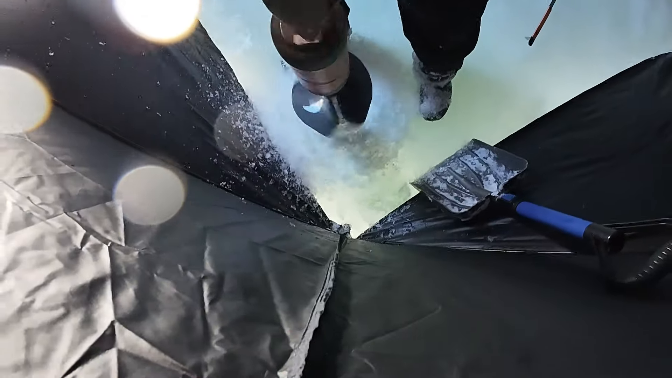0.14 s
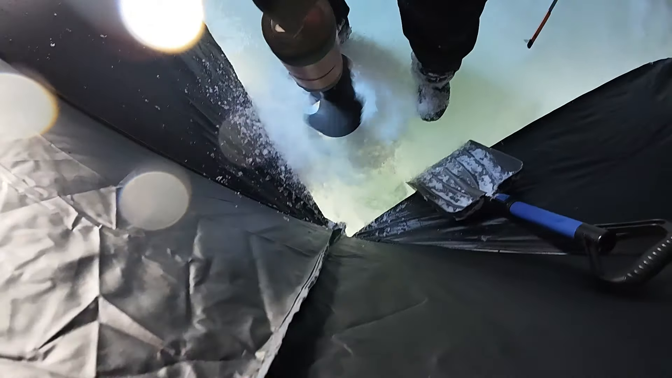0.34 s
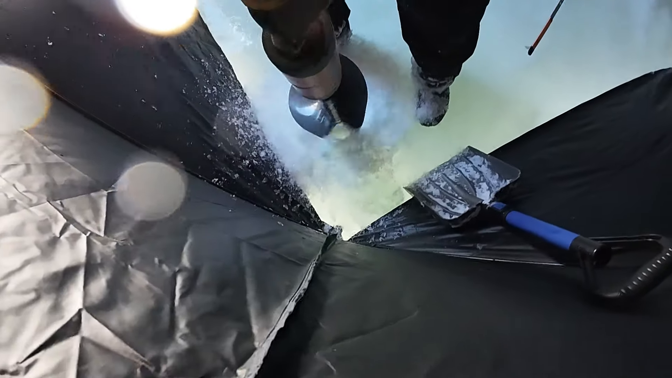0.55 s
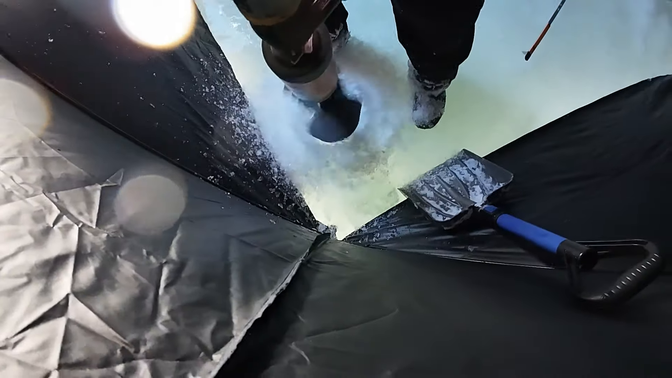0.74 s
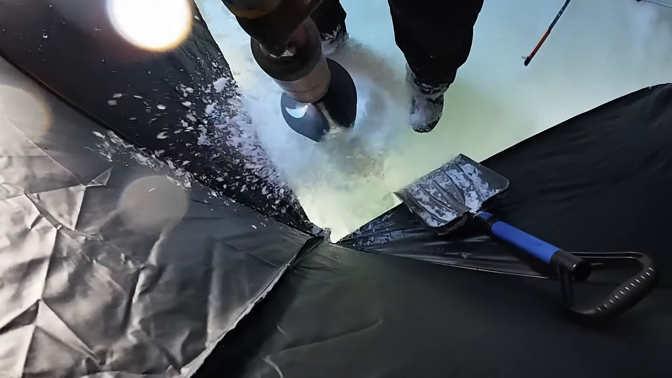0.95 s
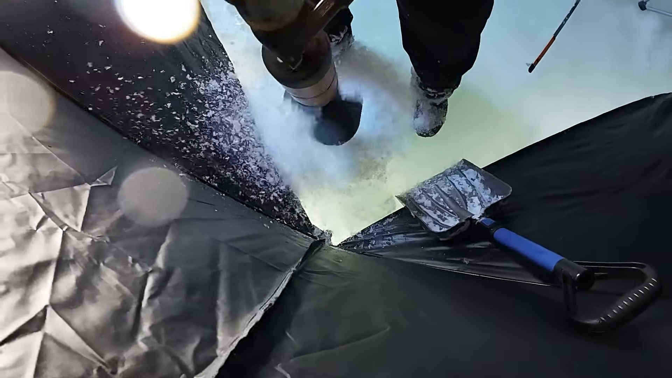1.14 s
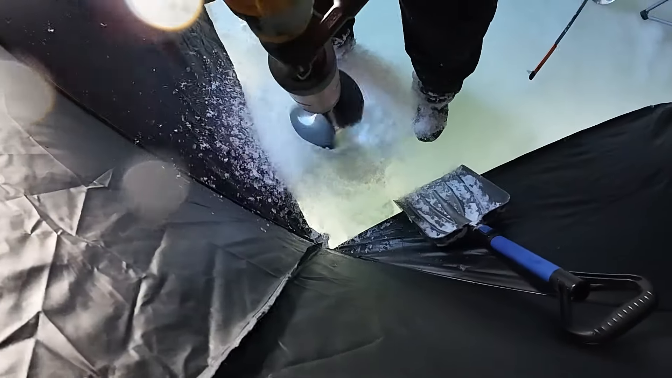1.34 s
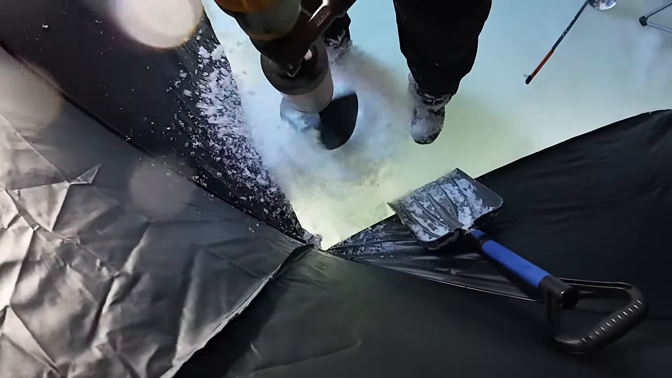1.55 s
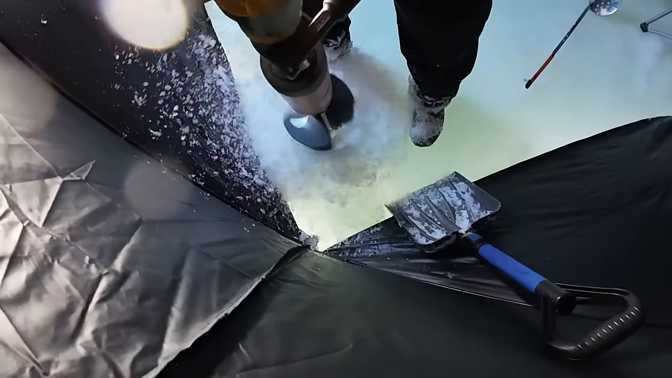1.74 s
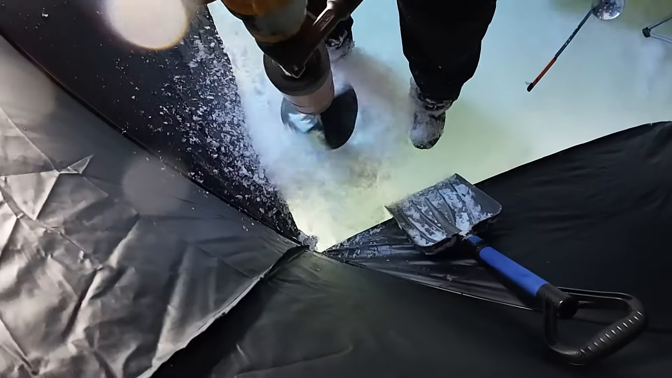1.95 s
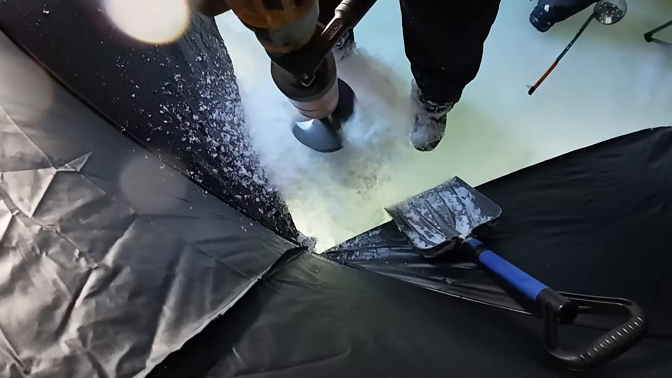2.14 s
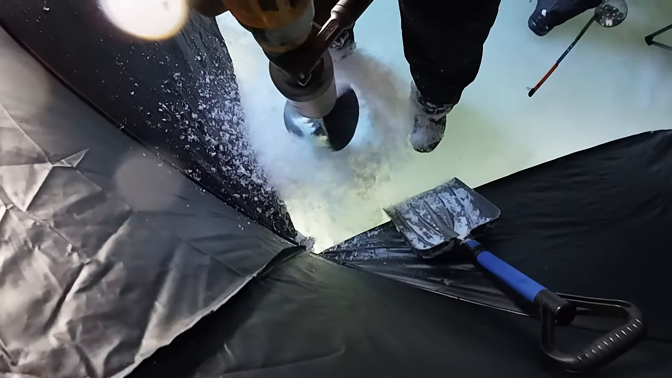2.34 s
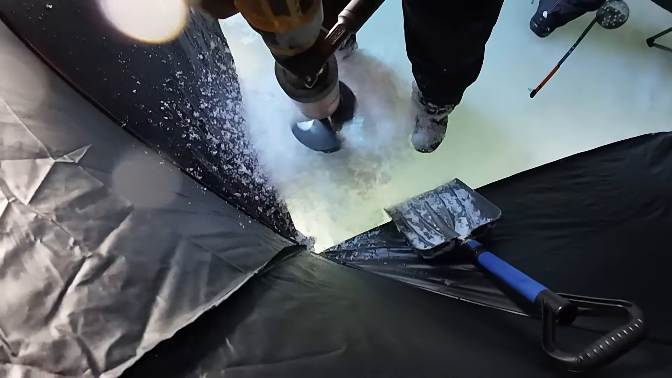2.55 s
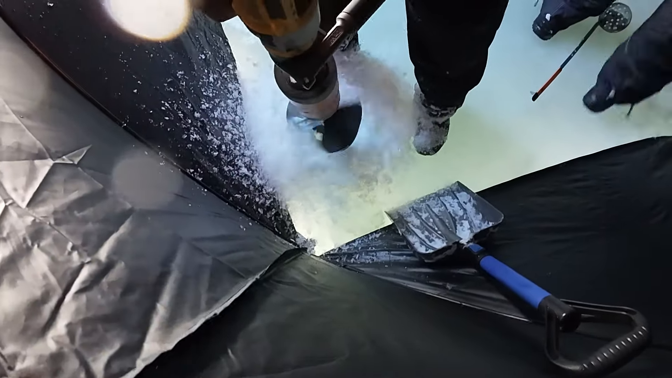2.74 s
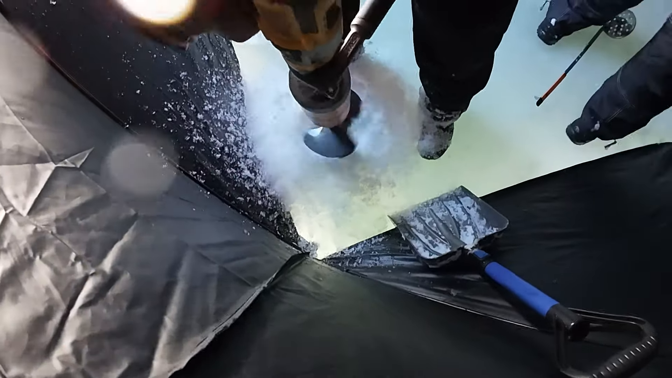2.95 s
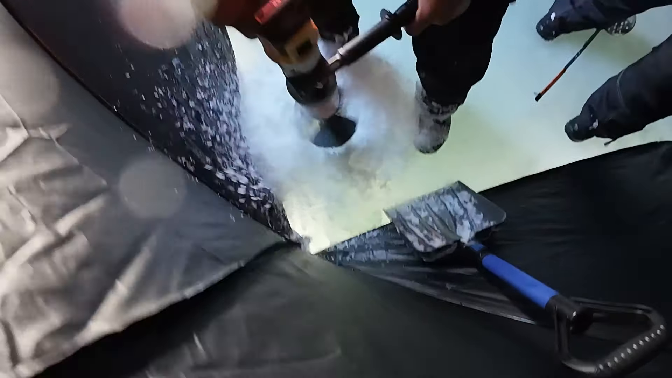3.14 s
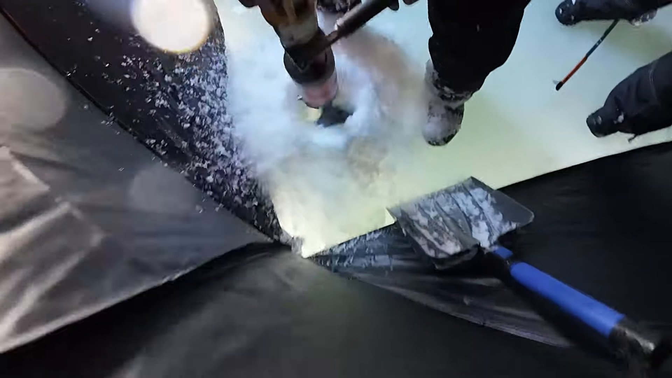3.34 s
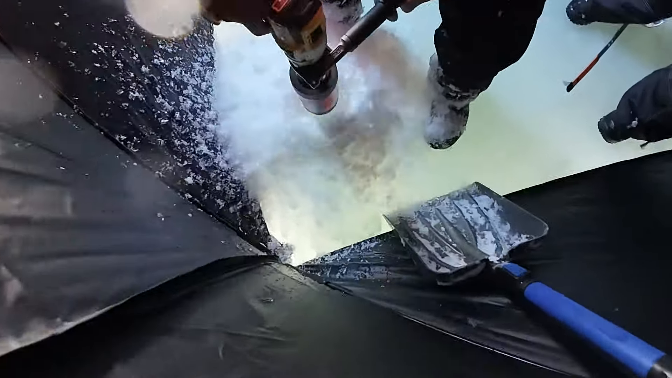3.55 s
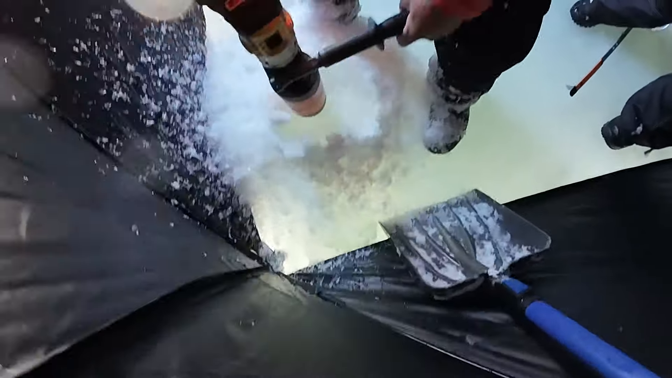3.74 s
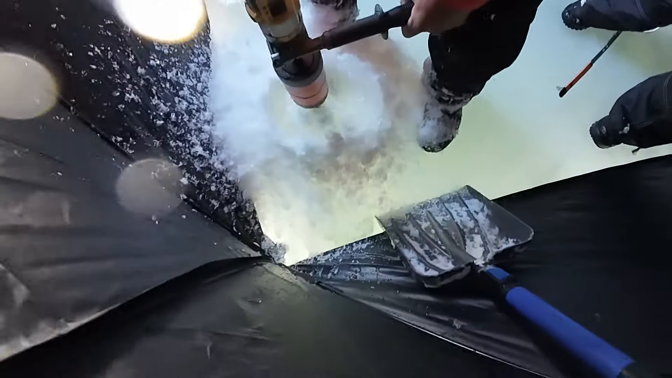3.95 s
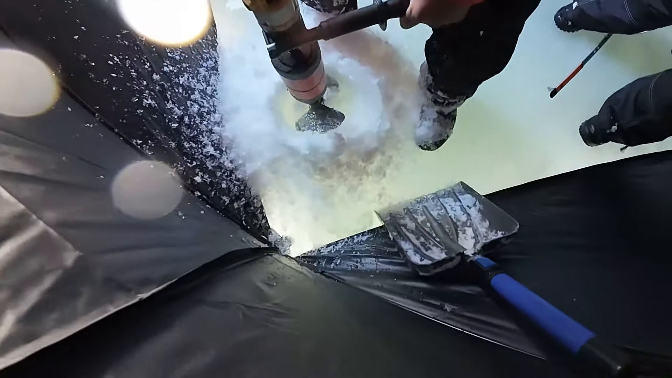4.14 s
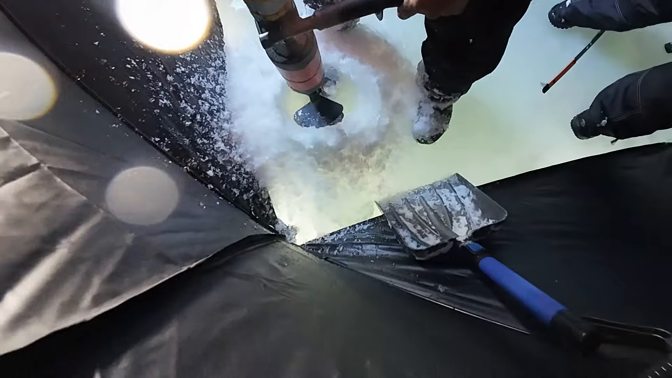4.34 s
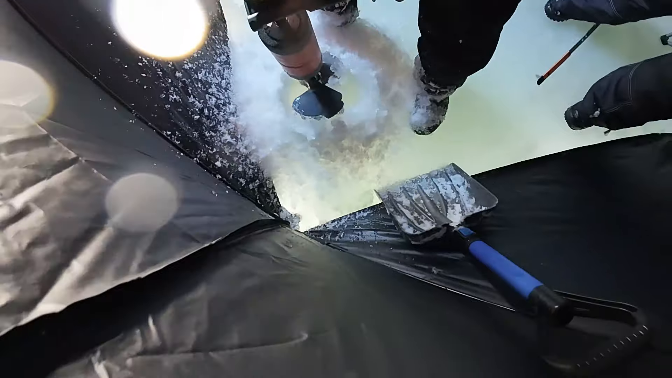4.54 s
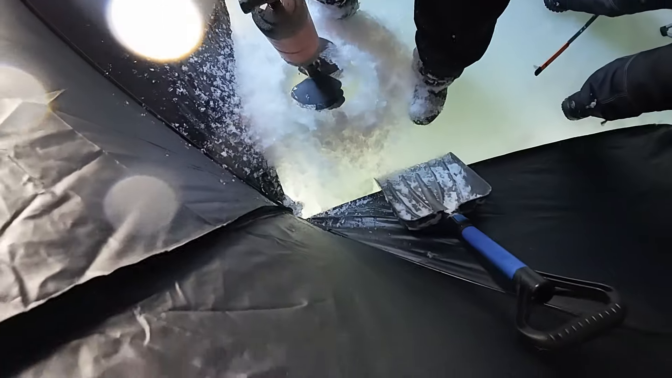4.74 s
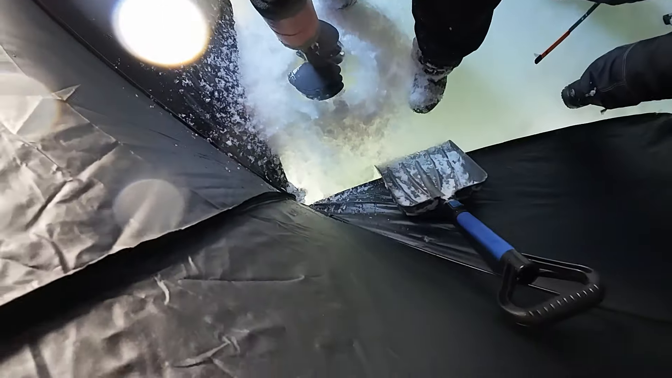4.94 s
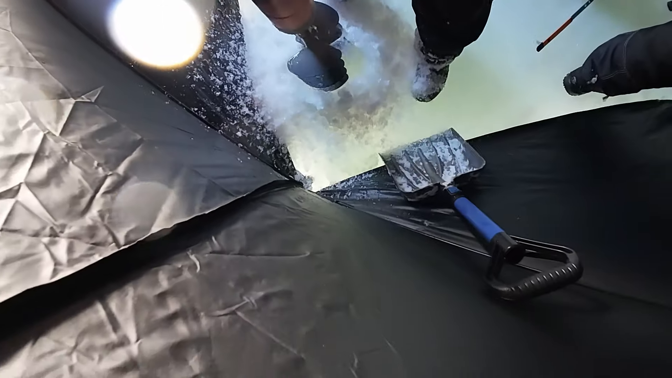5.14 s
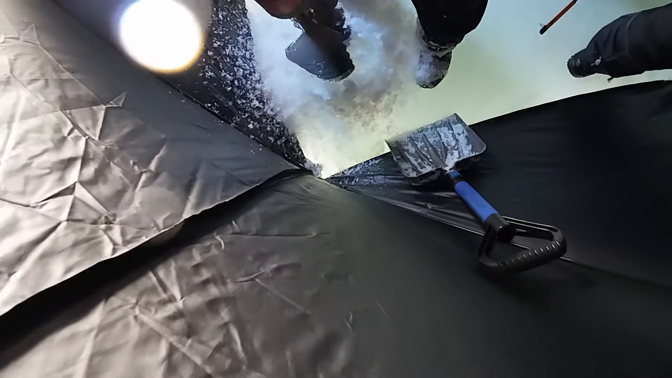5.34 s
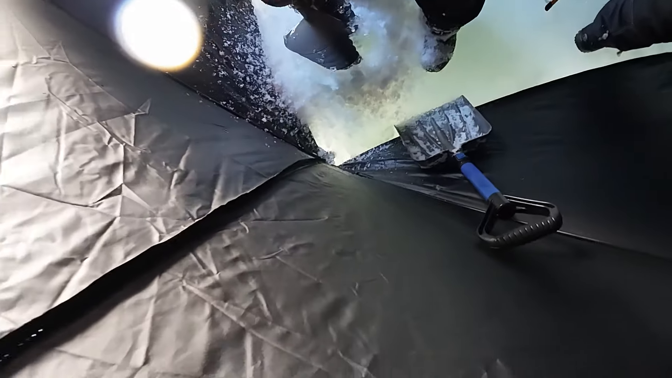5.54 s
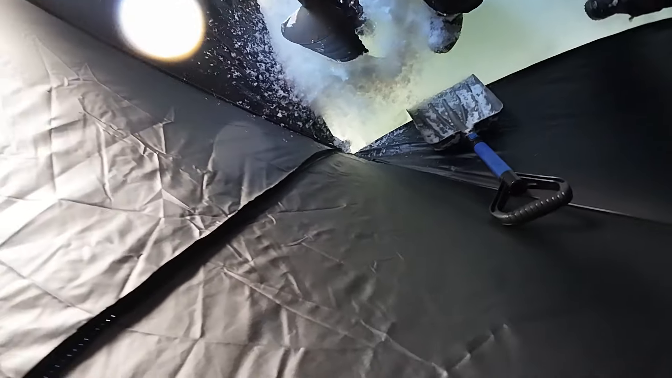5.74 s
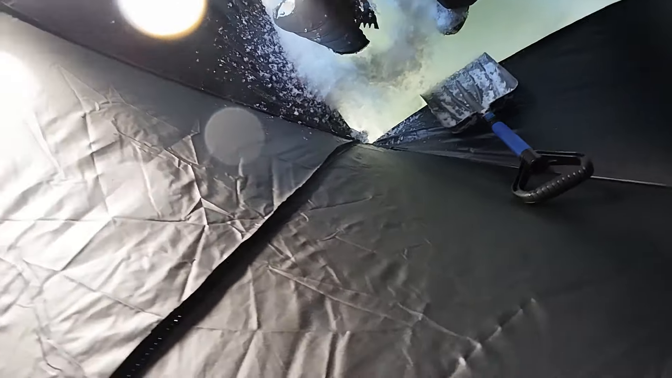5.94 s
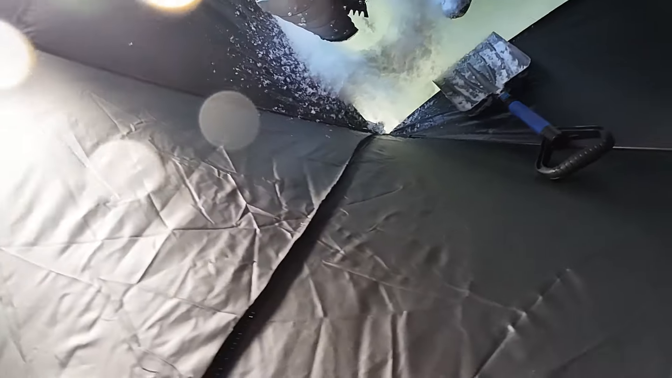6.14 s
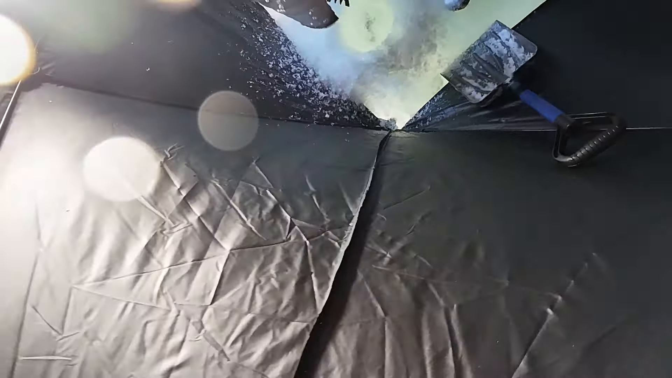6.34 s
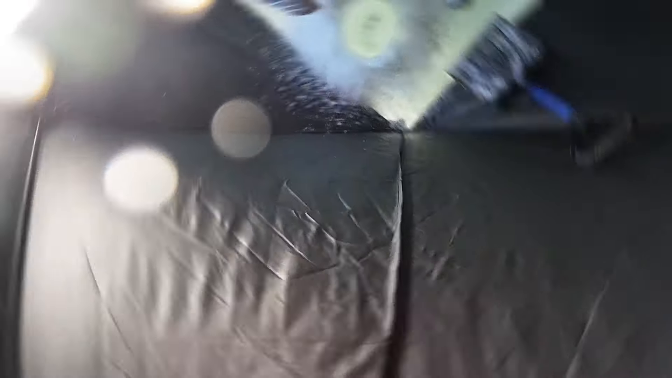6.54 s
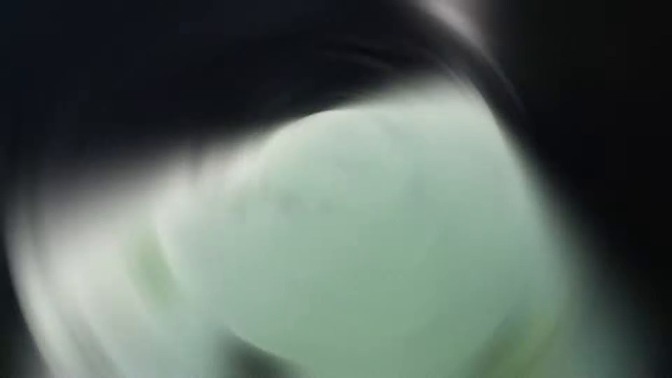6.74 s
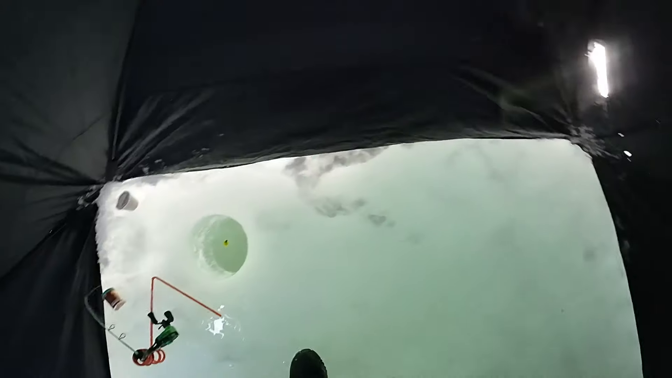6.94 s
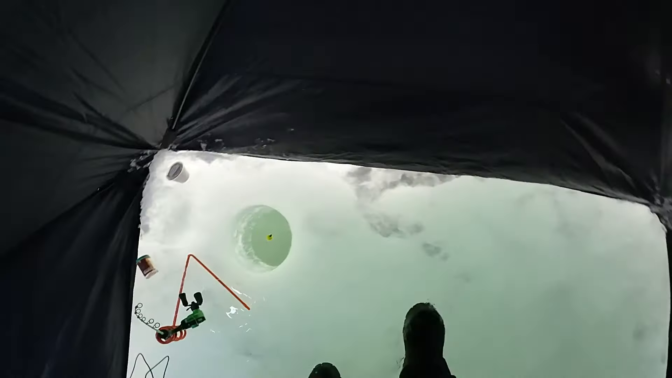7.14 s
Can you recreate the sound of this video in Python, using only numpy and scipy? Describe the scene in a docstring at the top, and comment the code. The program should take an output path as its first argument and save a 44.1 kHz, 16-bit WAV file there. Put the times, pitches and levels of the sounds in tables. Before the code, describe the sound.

Close in a shelter on the ice, a battery auger cuts with a loud gritty hiss, rough gear whine and pulsing scrape. At about three seconds it breaks through with knocks, the tone rises cleaner, then brakes abruptly with a snap. Quiet slush gulps, soft thuds, stiff cloth rustles and snowy ticks follow. Near the end come low buffets on the microphone and a faint sinking whine. Stereo, dry, the drill's treble slightly right.

```python
"""Battery auger in lake ice: ragged gear tones, fluttering motor whine, scraping blades, spraying chips.
Breakthrough unloads the gears to a cleaner tone; the brake pulls it down to a standstill.
Then slush gulps as swarms of ringing bubbles; knocks, clunks and thuds ring as decaying modes.
Cloth and snow crunch and snap as grains of noise; a faint whine of two harmonics sinks in pitch.
Low buffeting and still air, both shaped noise, lie beneath."""
import sys
import numpy as np
from scipy import signal
from scipy.fft import rfft, irfft, next_fast_len
from scipy.io import wavfile
from scipy.ndimage import uniform_filter1d, map_coordinates

SR = 44100
rng = np.random.default_rng(int(sys.argv[2]) if len(sys.argv) > 2 else 0)


def generate_wav(sig):
    """Save sig (samples, or channels by samples) to the path in sys.argv[1] as 16-bit PCM at SR."""
    pcm = np.round(np.clip(np.atleast_2d(sig).T, -1, 1) * 32767).astype(np.int16)
    wavfile.write(sys.argv[1], SR, pcm)


N = 321048

# Gear mesh while cutting: start_s, pitch_hz, overtone_db
MESH_CUTTING = [(0, 2640, -27), (.2, 2675, -25.5), (.3, 2555, -31), (.86, 2520, -33), (.94, 2764, -23),
                (1.0, 2505, -36), (1.1, 2690, -28), (1.2, 2500, -32), (1.38, 2540, -36), (1.44, 2660, -29),
                (1.475, 2400, -33), (1.52, 2467, -28), (1.65, 2475, -27), (1.78, 2670, -26),
                (1.82, 2427, -25), (1.94, 2640, -31), (2.0, 2475, -29), (2.15, 2507, -26),
                (2.4, 2570, -27.5), (2.52, 2507, -28), (2.64, 2693, -28), (2.7, 2550, -22),
                (2.755, 2820, -24), (2.84, 2460, -28), (2.96, 2475, -30), (3.04, 2570, -29),
                (3.07, 2493, -29)]
# Bit catching on rim or brake: centre_s, pitch_drop_hz, length_s, level_drop_db
CATCHES = [(2.996, 300, .015, 0), (3.138, 7.8, 0.0098, 8), (3.228, 110, 0.0073, -3),
           (3.296, 10, 0.017, 6.5), (3.322, 77, 0.0091, 2), (3.379, 117, 0.013, 2), (3.574, 124, .0084, 3),
           (3.599, 9.2, 0.011, 10), (3.635, 350, 0.011, 2), (3.653, 350, .007, 5), (3.675, 370, 0.0073, 0)]
# Cutting layers by name: start_db, deepening_db_per_s, burst_db, free_db, braking_db_per_s, dying_db_per_s
CUT_LAYERS = dict(shudder=(-31.5, 1.07, 5, -28, 47, 33.5), scrape=(-21.5, -1, 5.5, -25.5, 32, 134),
              chips=(-21, 0, 0.5, -24, 30, 118), hiss=(-19.5, 0.5, 0, -18.5, 102, 149))
# Operator's lean on the auger, scaled per layer: start_s, push_db
PUSH = [(0, -1), (.5, -0.5), (1.0, 1.5), (1.3, 0.5), (2.0, -1), (2.45, 0), (2.7, -1), (2.9, -2.5)]
# Spectra of the cutting noises: freq_hz, density_db
SHUDDER_SPECTRUM = [(15, -40), (25, -9), (54, -10), (86, -6.5), (120, -2.5), (216, -2.5), (362, -2.5),
                    (600, -7), (780, -9), (1320, -120)]
SCRAPE_SPECTRUM = [(300, -33), (550, -6), (900, -7.5), (2000, -7), (2600, -6.5), (4000, -83)]
CHATTER_SPECTRUM = [(350, -40), (700, -0.5), (1300, -0.5), (2500, -5), (4000, -42)]
CHIP_SPECTRUM = [(1200, -11), (2400, -1), (4000, 0), (5600, -2), (6600, -4.5), (7200, -19), (9000, -44)]
HISS_SPECTRUM = [(3000, -36), (6000, -3), (7100, -5.5), (8700, -1.5), (11500, -1.5), (14000, -6.5),
                 (16500, -15)]
# Resonances of shaft with blades, and of housing: mode_hz, width_hz, gain_db
SHAFT_MODES = [(224, 100, -3), (438, 30, -5), (883, 190, -2), (1162, 150, 3.5), (1523, 115, -3.5),
               (1860, 95, -1.5)]
HOUSING_MODES = [(7890, 220, 3.5), (12700, 260, -5), (13170, 380, 5), (15300, 210, -20.5)]
# Rough hum of the unloaded auger: start_s, level_db
HUM_LEVELS = [(3.1, -33), (3.19, -25), (3.27, -31), (3.31, -25.5), (3.38, -33.5), (3.55, -31.5),
              (3.65, -40)]
# Dull knocks: auger on rim, brake clunks, low thuds and hollow plops at the hole: start_s, level_db, pitch_hz
KNOCKS = [(3.06, -10.5, 449.6), (3.186, -13, 885), (3.21, -10.5, 1140), (3.343, -11.5, 1080),
          (3.468, -13.5, 1247), (3.655, -17.5, 1054), (3.677, -16.5, 820), (3.94, -13, 926),
          (4.25, -21.5, 270), (4.265, -24, 125), (4.277, -22.5, 1190), (4.285, -21, 305), (4.567, -17, 254),
          (4.45, -27, 95), (4.696, -27, 120), (4.863, -21.5, 442), (4.895, -20.5, 282), (4.905, -20.5, 121),
          (4.13, -27, 755), (4.715, -24, 266), (4.97, -21, 1243), (5.085, -25.5, 297), (5.151, -22.5, 353),
          (5.246, -22.5, 740), (5.275, -25, 617), (5.335, -27, 610), (5.433, -20, 860), (5.501, -22, 650),
          (5.56, -25, 625), (5.59, -28, 623), (5.619, -23, 1025), (5.632, -22, 643), (5.779, -22, 467),
          (5.819, -21.5, 429), (5.825, -27, 653), (5.849, -26, 660), (6.04, -23.5, 1456),
          (6.07, -27.5, 1340), (6.2, -29.5, 1007), (6.252, -30, 434), (6.879, -27, 1470), (7.16, -31, 344)]
# Surges of slush: full_s, hold_s, gulp_db, splash_db
SURGES = [(3.94, 0.041, -33.5, -29.5), (4.12, 0.12, -66, -37.5), (4.25, 0.044, -33, -38.5),
          (4.45, .03, -40, -43), (4.57, 0.014, -39, -42), (4.7, 0.038, -33.5, -40),
          (4.87, 0.049, -33.5, -33.5), (5.01, 0.079, -41.5, -42), (5.15, 0.03, -44, -49),
          (5.25, 0.15, -41.5, -44), (5.44, 0.12, -48, -40), (5.6, 0.11, -59, -38.5),
          (5.79, 0.078, -41.5, -39.5), (6.04, 0.11, -62, -41), (6.58, 0.023, -48, -47),
          (6.87, 0.046, -67, -41.5), (7.25, .03, -38, -33)]
# Trickle between surges: start_s, gulp_db, splash_db
TRICKLE = [(3.8, -59, -36.5), (4.2, -44.5, -38), (5.7, -59, -38.5), (6.0, -61, -48), (7.28, -50, -44.5)]
# Centre pitches of the hole's bubbles: start_s, gulp_hz, splash_hz
HOLE_PITCHES = [(4.9, 253, 1000), (5.2, 340, 821), (5.6, 330, 770), (5.8, 444, 734), (6.05, 380, 1230)]
# Spectrum of the wet splash: freq_hz, density_db
SPLASH_SPECTRUM = [(60, -60), (130, -17), (300, -9.5), (520, -6.5), (1150, -5), (1700, -7.5), (2500, -15),
                   (4000, -20), (6000, -56)]
# Rustles of cloth and snow: full_s, hold_s, crunch_db, fizz_db
RUSTLES = [(3.74, 0.013, -24, -35), (3.95, 0.19, -39, -45.5), (4.3, 0.48, -53, -47),
           (4.85, 0.05, -43, -40.5), (4.955, 0.077, -48, -40.5), (5.27, 0.047, -40.5, -51),
           (5.37, 0.013, -40, -39), (5.44, 0.017, -36.5, -34.5), (5.56, 0.15, -48, -47.5),
           (5.72, 0.24, -38, -41), (6.0, 0.28, -42.5, -42), (6.3, 0.11, -42, -39.5),
           (6.45, 0.031, -37, -34.5), (6.51, 0.056, -44, -42), (6.575, 0.032, -35.5, -38),
           (6.87, 0.028, -45, -64), (7.085, 0.017, -29.5, -37.5), (7.15, .08, -43, -49),
           (7.25, .03, -36, -43)]
# Spectra of crunch and fizz: freq_hz, density_db
CRUNCH_SPECTRUM = [(300, -90), (900, -19), (1500, -7), (2500, -2), (4000, -4), (6000, -11.5), (9000, -17.5)]
FIZZ_SPECTRUM = [(2650, -10.5), (4500, -2.5), (6220, -1), (6980, -6.5), (8690, -1.5), (12100, -2.5),
                 (13200, 2.5), (15700, -21)]
# Snaps and ticks: start_s, level_db, pitch_hz, treble_db
SNAPS = [(3.712, -6, 2005, 5), (3.717, -7.5, 4020, 6), (3.724, -16, 2320, -9), (3.917, -26, 890, -20),
         (3.9478, -16, 2070, -22), (3.952, -28, 4470, -10), (4.046, -26, 3500, -10),
         (3.9789, -30, 1810, -21), (4.522, -22.5, 1110, -9), (4.565, -23, 1300, -15),
         (4.608, -22, 1100, -7), (4.6307, -23, 1090, -3), (4.757, -24, 1190, -13), (4.787, -28, 1900, -15),
         (4.8437, -32, 9060, 4), (4.857, -26.5, 10400, 8), (4.8831, -32, 9400, 6), (4.9156, -35, 9000, 8),
         (4.9515, -35, 4900, 10), (4.997, -33, 4020, 2), (5.2466, -39, 2030, -11), (5.271, -30, 2130, -24),
         (5.439, -27, 1780, -15), (5.609, -29.5, 4600, -10), (5.7056, -22.5, 6100, -6),
         (5.7816, -31, 3550, 5), (5.8565, -27, 5100, 0), (5.852, -26, 2170, -19), (6.109, -24, 6100, -16),
         (6.16, -28, 3170, -13), (6.1867, -32, 2910, 3), (6.265, -30, 3120, 3), (6.2978, -21.5, 5500, -15),
         (6.3272, -20, 2850, -18), (6.3685, -17, 2850, -1), (6.3885, -27, 2200, 5), (6.4543, -37, 2190, -5),
         (6.4606, -26, 4450, 9), (6.5709, -30, 4250, -5), (7.0868, -37, 2210, -13),
         (7.2499, -20, 2390, -22)]
# Distant whine: start_s, second_harmonic_db, third_harmonic_db
FAR_LEVELS = [(6.5, -53, -46), (6.6, -40, -39), (6.66, -50, -39), (6.73, -54, -50), (6.8, -45, -43),
              (6.9, -43, -41), (7.0, -45, -47), (7.26, -48, -48)]
# Low rumble, first shaken by the drill, then blown on the ports: start_s, level_db
BUFFET_LEVELS = [(0, -55), (3.7, -42), (3.85, -54), (5.0, -63), (6.45, -74), (6.58, -38), (6.63, -48),
                 (6.75, -46), (6.79, -36), (6.82, -41), (6.855, -33), (6.9, -50), (6.96, -59), (7.28, -50)]
# Part of the rumble opposed between ports: start_s, opposed_gain
BUFFET_OPPOSED = [(5.0, .1), (5.4, .8)]
# Spectrum of still air in the shelter: freq_hz, density_db
AIR_SPECTRUM = [(20, 7), (60, 3), (200, 6), (500, -26), (1500, -30), (4000, -70)]
# Left-right likeness of auger and surroundings: freq_hz, correlation
AUGER_LIKENESS = [(60, .99), (130, .996), (400, .995), (700, .99), (1400, .994), (3100, .93), (6800, .7),
                  (15000, .7)]
AROUND_LIKENESS = [(60, .95), (200, .99), (400, .993), (1400, .985), (2400, .94), (4400, .75), (8000, .45),
                   (15000, .35)]
# Left over right, auger and surroundings: freq_hz, balance_db
AUGER_BALANCE = [(60, 0), (1400, 0), (3000, .6), (6000, .2), (9000, -2.6), (13000, -4), (16000, -4)]
AROUND_BALANCE = [(60, 0), (2400, 0), (4400, .5), (8000, -1), (15000, -1.5)]
# Phase by which left leads, auger: freq_hz, lead_rad
AUGER_LEAD = [(0, 0), (3450, 0), (9300, 1), (11600, 0.42), (12000, 0.4), (13600, 0.71), (14200, 0.83),
              (15400, 0.3)]

THROUGH_S, SPIN_UP_S, BRAKE_S, STOP_S = 3.07, 0.082, 3.614, 3.71
BURST_S, BURST_LENGTH_S = 3.036, 0.15  # breakthrough burst
MESH_FREE_HZ, MESH_CUTTING_FREE_DB, OVERTONE_FREE_DB = 3078, (-31, -15.5), -30
MESH_SING_UP_S = 0.18
BRAKE_HZ_PER_S, BRAKE_DB_PER_S = 670, 113
CASE_HZ, CASE_WIDTH_HZ, CASE_DB = 2440, 75, 2.5  # gear case sings along near its own tone
STAGE_RATIO = .617  # slower gear stage, pitch over mesh
STAGE_DB, STAGE_DB_PER_S, STAGE_FREE_DB = -37.5, 2.4, -35.5
WHINE_CUTTING_FREE_HZ, WHINE_CUTTING_FREE_DB = (10070, 12130), (-23, -25.5)
WHINE_HZ_PER_MESH_HZ = 3  # while cutting
BITE_HZ, FIRST_BITE_S, BITE_DECAY = 6.28, .015, 2.5  # two bites a turn; decay per bite period
SCRAPE_BITE_DB, SCRAPE_BITE_LOSS_DB_PER_S = 0.92, 0.3
CHATTER_DB, CHATTER_LOSS_DB_PER_S, CHATTERS_PER_S, CHATTER_BURST_DB = -24, 1.6, 450, 6
KNOCK_T60_S, SNAP_T60_S = 0.069, 0.027
SURGE_RISE_S, SURGE_FALL_S = 0.02, 0.061
RUSTLE_RISE_S, RUSTLE_FALL_S, IDLE_CRUNCH_DB, IDLE_FIZZ_DB = 0.0072, 0.033, -46.5, -49.5
TICKS_PER_S, TICK_DB = 70, -7  # level against the rustle
FAR_START_S, FAR_END_S, FAR_HZ, FAR_SAG_HZ_PER_S = 6.5, 7.26, 734, 77
TOP_HZ = 15780


def gears():
    """Mesh tones, ragged under load, cleaner when free; catches drop the pitch."""
    free = running_free()
    cutting_hz, overtone_db = curves(MESH_CUTTING)
    brake_chatter = window(3.635, 4, .01)
    load = np.maximum(between((.85, .12), free ** 2), .9 * brake_chatter)

    hz = between((cutting_hz, MESH_FREE_HZ), free) - BRAKE_HZ_PER_S * since(BRAKE_S)
    jitter = (.004 + .014 * load) * wobble(35)
    jitter += .07 * window(3.632, 4, .008) * wobble(500)
    drag_hz = sum(drop_hz * bump(s, length) for s, drop_hz, length, _ in CATCHES)
    hz = hz * (1 + jitter) - drag_hz

    dip_db = sum(db * bump(s, length) for s, _, length, db in CATCHES)
    dip_db += BRAKE_DB_PER_S * since(BRAKE_S + 0.016)
    first_db = between(MESH_CUTTING_FREE_DB, window(THROUGH_S, 9, MESH_SING_UP_S)) - dip_db
    first_db -= 5 * window(3.645, 4, .01)  # chatter smothers the tone
    first_db += CASE_DB * np.exp(-((hz - CASE_HZ) / CASE_WIDTH_HZ) ** 2)
    first_db += 4.4 * load * wobble(29.83)
    second_db = between((overtone_db, OVERTONE_FREE_DB), free) - dip_db + 2.5 * wobble(35)
    stage_db = between((STAGE_DB + STAGE_DB_PER_S * since(0), STAGE_FREE_DB), free)
    stage_db += 4.5 * wobble(35)

    tones = amp(first_db) * fuzzy_tone(hz, load, blur_hz=95.3)
    tones += amp(second_db) * fuzzy_tone(2 * hz, between((.9, .6), free), blur_hz=340)
    stage = fuzzy_tone(STAGE_RATIO * hz, .97, blur_hz=150)
    tones += amp(stage_db) * window(-1, 3.63, .02) * stage
    return tones * window(-1, STOP_S, 0.018)


def motor():
    """Broad whine strands that flutter in pitch and level once a rotor turn."""
    free = running_free()
    hz = between(WHINE_CUTTING_FREE_HZ, free)
    level_db = between(WHINE_CUTTING_FREE_DB, free) - 50 * since(BRAKE_S)
    mesh_hz = curves(MESH_CUTTING)[0]
    hz = hz + WHINE_HZ_PER_MESH_HZ * (mesh_hz - np.median(mesh_hz)) * (1 - free)
    turn_rad = 2 * np.pi * np.cumsum(hz / 164) / SR
    jitter = between((.014, .005), free) * wobble(70)  # steadier when unloaded
    flutter_hz = hz * (1 + 0.011 * np.sin(turn_rad) + jitter)
    strands = fuzzy_tone(flutter_hz, 1, blur_hz=950)
    strands += amp(-10.5) * fuzzy_tone(flutter_hz * 5 / 4, 0.88, blur_hz=814)
    strands += amp(-10.0) * fuzzy_tone(flutter_hz * 3 / 2, .98, blur_hz=800)
    level_db = level_db + 2.6 * np.sin(turn_rad) + 3.04 * wobble(24.73)
    return amp(level_db) * strands * window(-1, STOP_S, 0.015)


def blades():
    """Ice shudders, blades scrape and ring the shaft, hard grains break, chips spray, housing hisses."""
    shudder_db, scrape_db, chip_db, hiss_db = [cut_level(*row) for row in CUT_LAYERS.values()]
    push_db, = curves(PUSH)
    phase = (BITE_HZ * (np.arange(N) / SR - FIRST_BITE_S)) % 1
    attack = uniform_filter1d(np.exp(-BITE_DECAY * phase), size=900)  # sets in fast, then eases
    bite = unit(attack - attack.mean()) + 0.35 * wobble(25)

    shudder = grit(SHUDDER_SPECTRUM, spike_db=3, lump_db=2.5, lumps=32)
    shudder = unit(filtered(shudder, ringing(SHAFT_MODES, direct=0.68)))
    scrape = knotted(grit(SCRAPE_SPECTRUM, spike_db=1.5, lump_db=1.0, lumps=90), depth_db=2.5)
    scrape = unit(filtered(scrape, ringing(SHAFT_MODES, direct=1.0)))
    chatter = knotted(sparks(CHATTERS_PER_S, spread_db=3, spectrum=CHATTER_SPECTRUM), depth_db=2.5)
    chatter = unit(filtered(chatter, ringing(SHAFT_MODES, direct=0.37)))
    chips = grit(CHIP_SPECTRUM, spike_db=1, lump_db=1.16, lumps=60)
    hiss = grit(HISS_SPECTRUM, spike_db=1.0, lump_db=1.1, lumps=45)
    hiss = unit(filtered(hiss, ringing(HOUSING_MODES, direct=0.89)))

    scrape_bite_db = (SCRAPE_BITE_DB - SCRAPE_BITE_LOSS_DB_PER_S * since(0)) * bite
    chatter_db = CHATTER_DB - CHATTER_LOSS_DB_PER_S * since(0) + 2.16 * bite + push_db
    chatter_db += CHATTER_BURST_DB * bump(BURST_S, BURST_LENGTH_S)
    sound = amp(shudder_db + 1.9 * push_db + 1.0 * bite) * shudder
    sound += amp(scrape_db + 0.38 * push_db + scrape_bite_db) * scrape
    sound += amp(chatter_db) * (1 - running_free()) * chatter
    sound += amp(chip_db + 0.46 * bite) * chips
    return sound + amp(hiss_db) * hiss


def free_hum():
    """Unloaded auger rumbles in the hole: two blurred tones."""
    hum = fuzzy_tone(250 * (1 + 0.0786 * wobble(19)), 0.99, blur_hz=149.8)
    hum += amp(-2.5) * fuzzy_tone(385 * np.ones(N), 1.0, blur_hz=120.3)
    return amp(curves(HUM_LEVELS)[0]) * hum * window(3.1, 3.65, 0.027)


def knocks():
    """Knocks, clunks and thuds: each softly sets off four decaying modes."""
    out, t = np.zeros(N + SR), np.arange(SR // 5) / SR
    for s, db, hz in KNOCKS:
        scatter = 0.0803 * rng.standard_normal(4) * (np.arange(4) > 0)  # main mode stays put
        modes_hz = hz * np.exp(np.array([0, 0.48, -0.27, 0.89]) + scatter)
        ring = amp([1.5, -7.5, -8.5, -8]) @ np.sin(2 * np.pi * modes_hz[:, None] * t)
        shape = amp(db - 60 * t / KNOCK_T60_S) * (1 - np.exp(-t / 0.0042))
        out[round(s * SR):][:len(t)] += shape * ring
    return out[:N]


def water():
    """Slush gulps at the hole's hollow tone; other bubbles burst over a wet splash."""
    surge_gains = swells(SURGES, SURGE_RISE_S, SURGE_FALL_S)
    gulp_gain, splash_gain = np.hypot(surge_gains, amp(curves(TRICKLE)))
    gulp_hz, splash_hz = curves(HOLE_PITCHES)
    gulp = bubbles(gulp_hz, count=1700, cycles=9, spread=0.27)
    burble = bubbles(splash_hz, count=1700, cycles=22.4, spread=0.26)
    splash = 0.6 * burble + 0.8 * grit(SPLASH_SPECTRUM, spike_db=3.0, lump_db=0.5, lumps=37)
    return (gulp_gain * gulp + splash_gain * splash) * window(3.81, 9, 0.14)


def bubbles(centre_hz, count, cycles, spread):
    """Two streams, rms 1: each bubble starts softly and rings while its pitch rises."""
    draw = rng.standard_normal((count, 2))
    start = rng.integers(0, N, size=count)
    t = np.arange(SR // 16) / SR
    hz = (centre_hz[start] * np.exp(spread * draw[:, 0]))[:, None]
    age = t * hz / cycles  # 1 when 60 dB down
    size_db = 4.5 * draw[:, 1:]
    envelope = amp(size_db - 60 * age) * (1 - np.exp(-25 * age)) ** 2
    ring = envelope * np.sin(2 * np.pi * hz * t * (1 + 0.19 * age))
    spot = (start[:, None] + np.arange(len(t))).ravel()
    stream = unit(np.bincount(spot, ring.ravel(), N + len(t))[:N])
    return np.array([stream, np.roll(stream, SR // 3)])


def rustle():
    """Stiff cloth and snow underfoot crunch in clumps of grains with crisp ticks."""
    idle = amp([[IDLE_CRUNCH_DB], [IDLE_FIZZ_DB]])
    crunch_gain, fizz_gain = np.hypot(swells(RUSTLES, RUSTLE_RISE_S, RUSTLE_FALL_S), idle)
    clump = wobble(30)
    crunch = amp(1.15 * clump) * grit(CRUNCH_SPECTRUM, spike_db=1.0, lump_db=1.5, lumps=140)
    crunch += amp(TICK_DB) * sparks(TICKS_PER_S, spread_db=6, spectrum=CRUNCH_SPECTRUM)
    fizz = amp(1.0 * clump) * grit(FIZZ_SPECTRUM, spike_db=1.0, lump_db=2.5, lumps=110)
    fizz += amp(TICK_DB) * sparks(TICKS_PER_S, spread_db=2, spectrum=FIZZ_SPECTRUM)
    return (crunch_gain * crunch + fizz_gain * fizz) * window(STOP_S, 9, 0.044)


def snaps():
    """Each snap rings briefly around its pitch under a broad crack."""
    out, t = np.zeros((2, N + SR)), np.arange(SR // 5) / SR
    shape = amp(-60 * t / SNAP_T60_S) * (1 - np.exp(-t / 0.00031))
    for s, db, hz, treble_db in SNAPS:
        noise = rng.standard_normal((2, 2, len(t))) + 1j * rng.standard_normal((2, 2, len(t)))
        carrier = np.exp(2j * np.pi * hz * t)
        ring = unit(np.real(uniform_filter1d(noise[0], size=100) * carrier))
        crack = unit(np.real(uniform_filter1d(noise[1], size=9) * carrier))
        edge = unit(np.diff(noise[1].imag, 2, prepend=[[0, 0]] * 2))
        burst = 0.78 * ring + 0.66 * crack + amp(treble_db) * edge
        # evens out chance strength
        even = np.linalg.norm(shape) * np.std(burst) / np.linalg.norm(shape * burst[0])
        out[:, round(s * SR):][:, :len(t)] += amp(db) * even * shape * burst
    return filtered(out[:, :N], lambda hz: (1j * hz / (600 + 1j * hz)) ** 2)  # small things push no bass


def far_whine():
    """Second and third harmonics of a faint rough tone that sinks in pitch."""
    age_s = since(FAR_START_S)
    hz = (FAR_HZ - FAR_SAG_HZ_PER_S * age_s) * (1 + 0.012 * wobble(45))
    second_db, third_db = curves(FAR_LEVELS) + 1.5 * np.array([wobble(25), wobble(25)])
    tones = amp(second_db) * fuzzy_tone(2 * hz, .93, blur_hz=110)
    tones += amp(third_db) * fuzzy_tone(3 * hz, .93, blur_hz=160)
    return tones * window(FAR_START_S, FAR_END_S, 0.051)


def buffet():
    """Low noise: shaking thumps both ports alike, moving air sets them apart."""
    low = [(12, -25), (30, -4.0), (55, -1.5), (110, -14), (300, -69)]  # freq_hz, density_db
    alike, opposed = grit(low, spike_db=4.5, lump_db=-0.5, lumps=20)
    opposed_gain, = curves(BUFFET_OPPOSED)
    level_db = curves(BUFFET_LEVELS)[0] + 4.6 * wobble(5.5)
    return amp(level_db) * (alike + opposed_gain * opposed * np.array([[1], [-1]]))


def still_air():
    """Faint low-weighted noise of the air in the shelter."""
    return amp(-59.0) * grit(AIR_SPECTRUM, spike_db=1.5, lump_db=-5.5, lumps=14.0)


def running_free():
    """0 while the blades cut, 1 once the bit is through and up to speed."""
    return window(THROUGH_S, 9, SPIN_UP_S)


def cut_level(start_db, deeper, burst_db, free_db, braked, dying):
    """Level in dB of one cutting layer, from first bite past standstill."""
    steady_db = between((start_db + deeper * since(0), free_db), running_free())
    loss_db = braked * (since(BRAKE_S) - since(STOP_S)) + dying * since(STOP_S)
    return steady_db + burst_db * bump(BURST_S, BURST_LENGTH_S) - loss_db


def fuzzy_tone(hz, fuzz, blur_hz):
    """Two unrelated sines, rms 1, on a pitch curve; share fuzz is blurred into narrow noise."""
    blur = np.array([wobble(blur_hz) + 1j * wobble(blur_hz) for _ in range(2)]) / np.sqrt(2)
    fuzz = np.clip(fuzz, 0, 1)
    clean = np.sqrt(1 - fuzz) * np.array([[1], [1j]])
    carrier = np.exp(2j * np.pi * np.cumsum(hz) / SR)
    return np.sqrt(2) * np.real((clean + np.sqrt(fuzz) * blur) * carrier)


def grit(spectrum, spike_db, lump_db, lumps):
    """Two unrelated noises, rms 1, sharing spikes and lumps: many tiny contacts."""
    gain_db = spike_db * wobble(900) + lump_db * wobble(lumps)
    raw = rng.standard_normal((2, N)) * amp(gain_db)
    return unit(filtered(raw, lambda hz: amp(along(spectrum, hz))))


def sparks(rate, spread_db, spectrum):
    """Two streams, rms 1: single contacts at random moments, of uneven size."""
    hit = (rng.random(N) < rate / SR) * amp(spread_db * rng.standard_normal(N))
    decay = amp(-60 * np.arange(SR // 100) / SR / .006)  # T60 6 ms
    burst = signal.fftconvolve(hit, decay)[:N]
    return unit(filtered(burst * rng.standard_normal((2, N)), lambda hz: amp(along(spectrum, hz))))


def knotted(x, depth_db):
    """Random gain knots in time and frequency: blades catch now here, now there."""
    z = signal.stft(x, nperseg=512)[2]
    field = uniform_filter1d(rng.standard_normal(z.shape[1:]), size=3, axis=0)
    field = uniform_filter1d(field, size=4, axis=1)
    return signal.istft(z * amp(depth_db * unit(field)), nperseg=512)[1][:, :N]


def ringing(modes, direct):
    """Response of a body that passes some sound straight and rings at its modes."""
    def response(f):
        return direct + sum(amp(db) * 1j * f * w / (c * c - f * f + 1j * f * w) for c, w, db in modes)
    return response


def swells(rows, rise, fall):
    """Gain per level column of events that rise, hold and die away."""
    def shape(s, hold):
        return np.clip(since(s - rise) / rise, 0, 1) * np.exp(-since(s + hold) / fall)
    return sum(np.outer(amp(dbs), shape(s, hold)) for s, hold, *dbs in rows)


def amp(db):
    """Gain of a level in dB."""
    return 10 ** (np.asarray(db) / 20)


def unit(x):
    """x at rms 1."""
    return x / np.sqrt(np.mean(x ** 2) + 1e-20)


def along(points, hz):
    """Value at hz, from (freq_hz, value) points on a log axis."""
    f, v = np.transpose(points)
    return np.interp(np.log(hz + 1), np.log(f + 1), v)


def curves(rows):
    """One value per sample for each column after the time."""
    s, *cols = np.transpose(rows)
    return [np.interp(np.arange(N) / SR, s, c) for c in cols]


def window(start, end, fade):
    """0 outside two times, fading to 1 inside them."""
    t = np.arange(N) / SR
    return np.clip((t - start) / fade, 0, 1) * np.clip((end - t) / fade, 0, 1)


def since(s):
    """Seconds gone after a moment, 0 before it."""
    return np.maximum(np.arange(N) / SR - s, 0)


def between(pair, share):
    """From the first value to the second."""
    return pair[0] + (pair[1] - pair[0]) * share


def bump(s, length):
    """Bell curve of height 1 centred on s."""
    return np.exp(-((np.arange(N) / SR - s) / length) ** 2)


def wobble(rate):
    """Smooth random curve, rate knots a second."""
    knots = rng.standard_normal(int(N * rate / SR) + 4)
    return map_coordinates(knots, [np.arange(N) * rate / SR])


def filtered(x, response):
    """x times a complex response of frequency."""
    m = next_fast_len(N + SR // 2)
    return irfft(rfft(x, m) * response(np.fft.rfftfreq(m, 1 / SR)), m)[..., :N]


def ports(pair, alike, lean, lead):
    """Shared and unrelated sound reach two ports with set likeness, balance and lead."""
    side = np.array([[1], [-1]])  # left, right

    def turn(hz):
        return np.arccos(np.clip(along(alike, hz), 0, 1)) / 2

    def place(hz):
        return amp(side * along(lean, hz) / 2) * np.exp(.5j * side * along(lead, hz))

    shared = filtered(pair[0], lambda hz: place(hz) * np.cos(turn(hz)))
    return shared + filtered(pair[1], lambda hz: place(hz) * side * np.sin(turn(hz)))


def scene():
    """Auger with its treble leaning right; the other sounds spread around."""
    drill = gears() + motor() + blades() + free_hum()
    auger = ports(drill, AUGER_LIKENESS, AUGER_BALANCE, AUGER_LEAD)
    surroundings = knocks() + water() + rustle() + snaps() + far_whine() + still_air()
    around = ports(surroundings, AROUND_LIKENESS, AROUND_BALANCE, [(0, 0)])
    return auger + around + buffet()


def record(dry):
    """Soft limit towards full scale, then cut all above TOP_HZ."""
    soft = dry / (1 + np.abs(dry) ** 6) ** (1 / 6)
    return filtered(soft, lambda hz: hz < TOP_HZ)


dry = scene()
out = record(dry)
generate_wav(out)
```